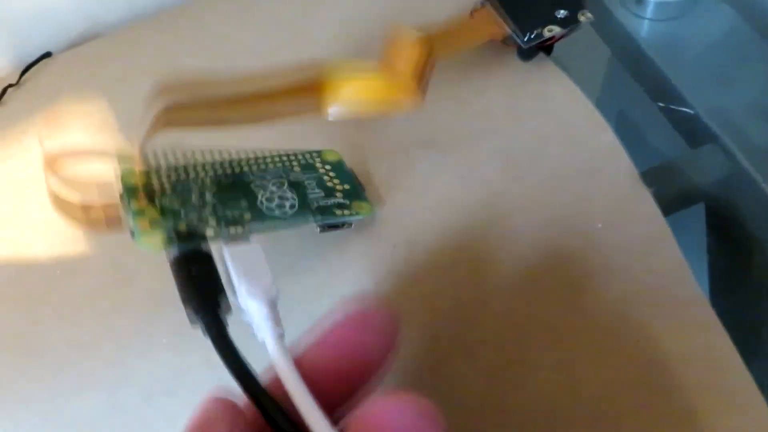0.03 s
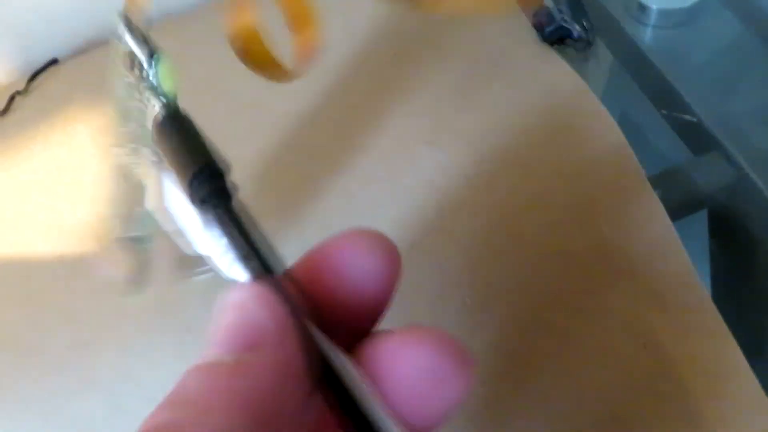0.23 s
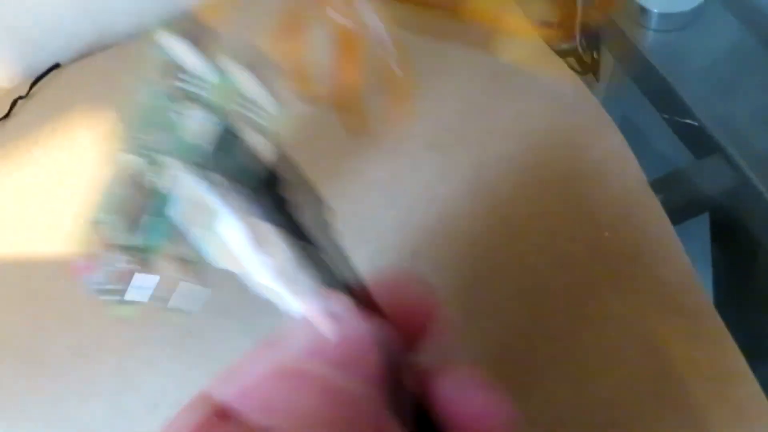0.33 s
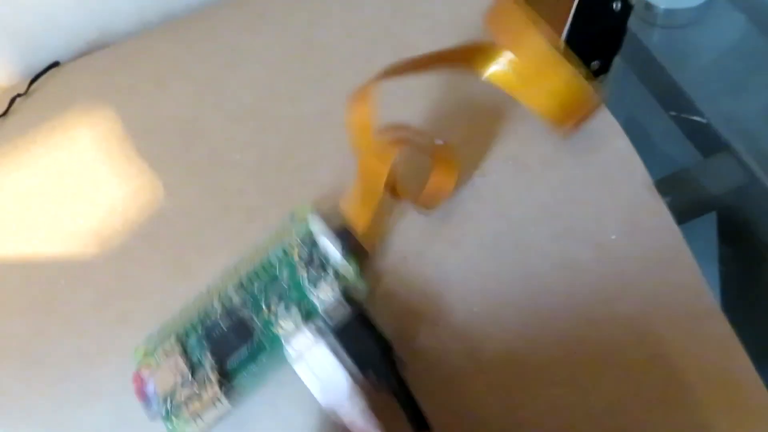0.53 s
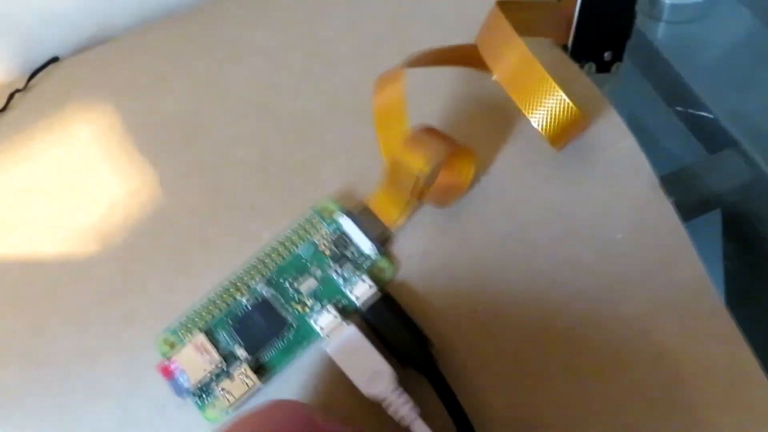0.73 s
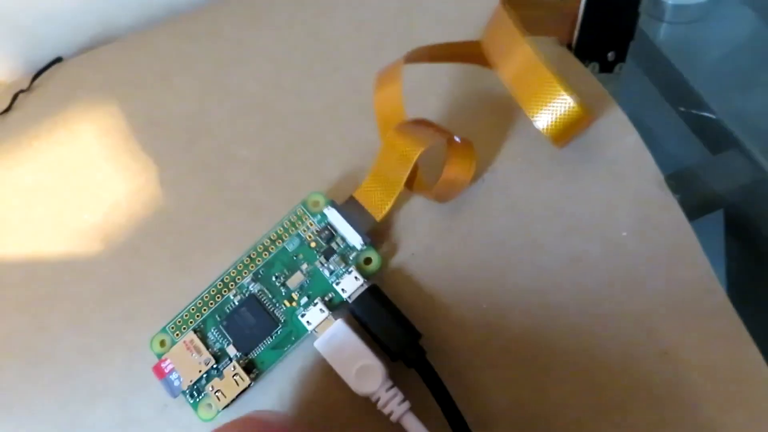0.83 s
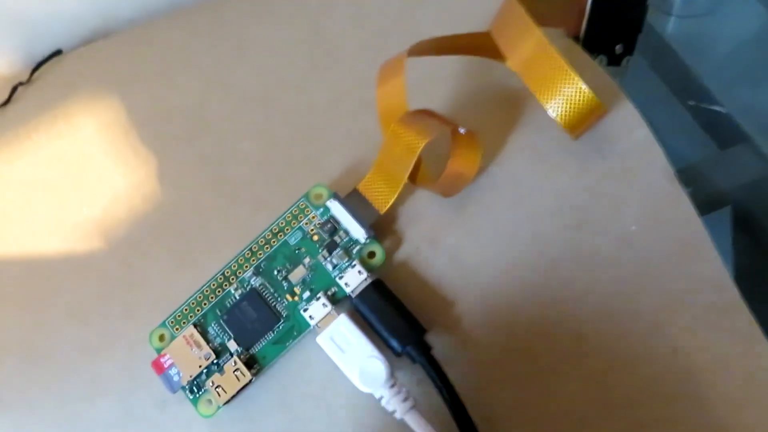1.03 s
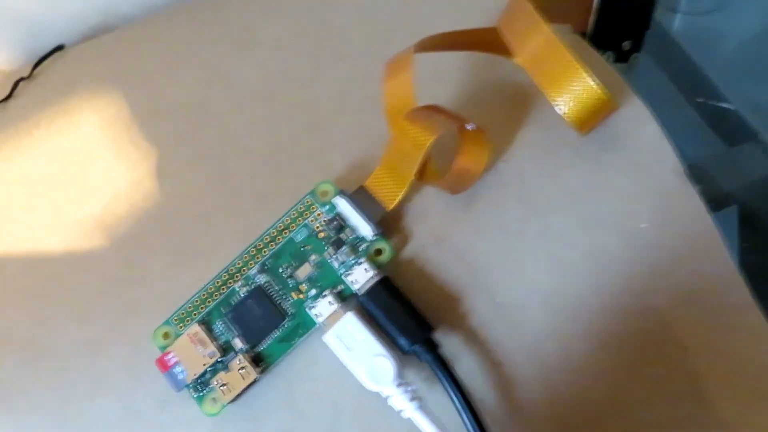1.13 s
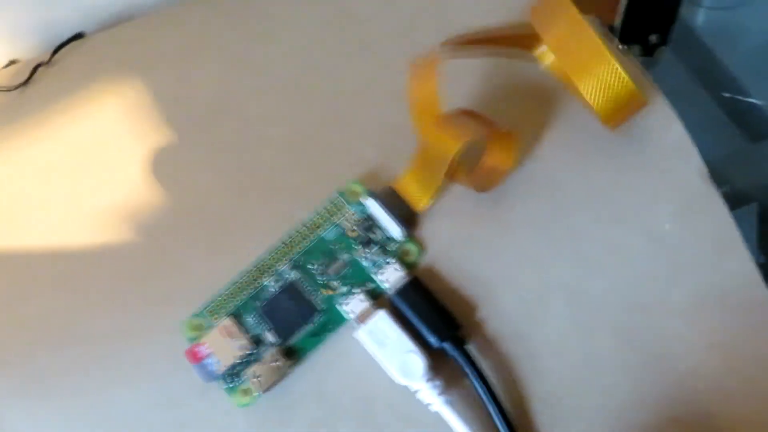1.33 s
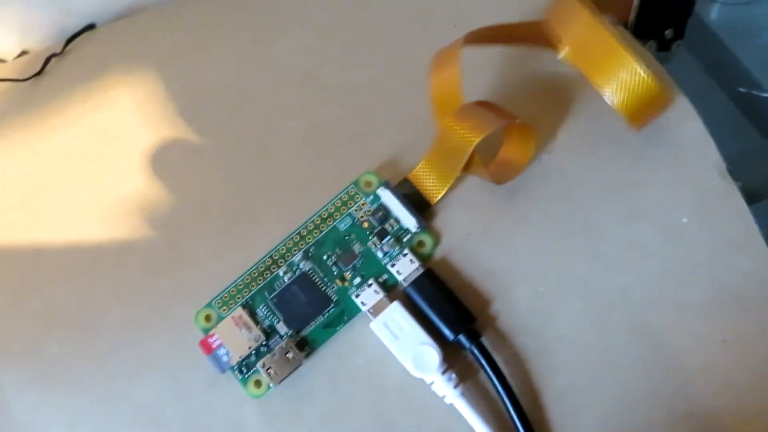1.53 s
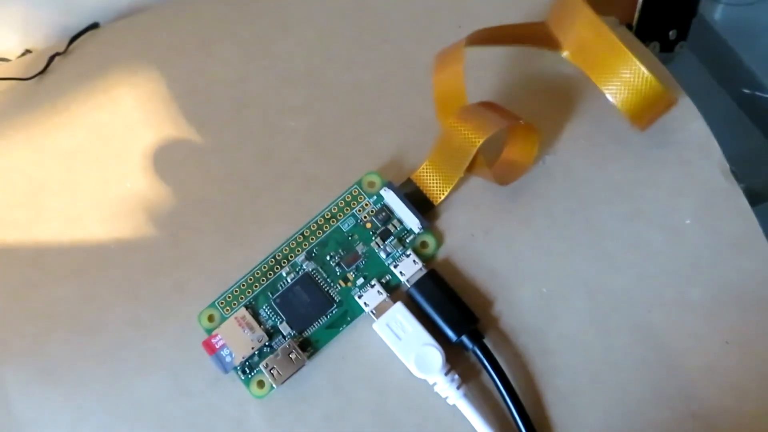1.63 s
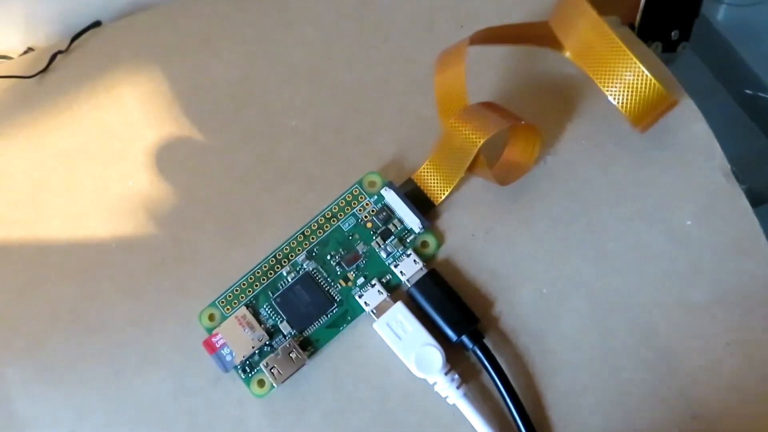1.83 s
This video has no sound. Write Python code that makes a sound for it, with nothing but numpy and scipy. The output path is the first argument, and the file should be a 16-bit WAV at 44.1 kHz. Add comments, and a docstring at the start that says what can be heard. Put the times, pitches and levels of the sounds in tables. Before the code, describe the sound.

A small circuit board rustles as it is turned over, then clatters onto a paper-covered table, sliding and settling in light knocks. A moment later its cables thump down and jolt it. Close microphone in a small, quiet room.

```python
"""A circuit board laid on a table

A small board with plugged-in cables is turned over by hand and laid on a paper-covered table,
close to the microphone. Its ribbon cable rubs on the paper; an edge taps down and rings, then the
board drops, slides and settles in small knocks. A moment later the released cables fall onto
the table, jolting the board again. A small, quiet room surrounds it."""
import sys
import numpy as np
from scipy import signal
from scipy.fft import rfft, irfft, next_fast_len
from scipy.io import wavfile
from scipy.ndimage import map_coordinates

SR = 44100
rng = np.random.default_rng(int(sys.argv[2]) if len(sys.argv) > 2 else 0)


def wav_record(signal):
    """Record a signal, one row per channel, as 16-bit PCM in the file named by sys.argv[1]."""
    frames = np.transpose(np.atleast_2d(signal))
    bounded = np.clip(frames, -1, 1)
    # unit amplitude maps onto the largest positive 16-bit level
    quanta = np.round(bounded * 32767).astype(np.int16)
    wavfile.write(sys.argv[1], SR, quanta)


N = 83790  # 1.9 seconds

# The tone colour of six noises. Each row: frequency in Hz, relative level in dB.
AIR_COLOUR = [(15, -40), (25, -13), (71, -16.5), (106, -4), (219, -13), (309, -10), (543, -21), (879, -15),
              (1240, -19), (1910, -20), (7890, -36.5), (12800, -49), (15000, -80)]
SCRAPE_COLOUR = [(150, -44), (350, -19.5), (640, -7.5), (830, -12.5), (1150, -6), (1350, -4.5), (1650, -1),
                 (1880, -4), (2100, -8.5), (2480, -6), (3200, -11), (4200, -18), (5000, -17), (7000, -41),
                 (12000, -62)]
HISS_COLOUR = [(3000, -12), (5500, 3), (7500, -0.5), (10000, -1.5), (13000, -3.5), (15500, -7.5)]
RUMBLE_COLOUR = [(25, -20), (60, -5.5), (120, 1), (250, -3), (400, -5.5), (800, -11), (2000, -55)]
TICK_COLOUR = [(600, -2), (1700, 7.5), (3000, -2.5), (5200, -1.5), (7000, -6), (11000, -9.5),
               (15500, -10.5)]
CRACK_COLOUR = [(40, -11), (130, -5.5), (600, 1.5), (820, -2.5), (1500, -1), (3500, -4.5), (6500, -20.5),
                (15000, -28.5)]

# Three sliding moves. Each row: time in seconds, then relative levels in dB of scrape, hiss and rumble.
TURNING = [(0, -70, -68, -54.5), (.055, -52, -56, -61.5), (.1, -47, -54, -49.5), (0.154, -43.5, -51.5, -59),
           (.2, -27.5, -68, -37.5), (.245, -28, -46, -50), (.265, -25, -40, -53),
           (0.313, -18.5, -30, -44.5), (.335, -36.5, -54, -35), (.36, -41.5, -67, -56),
           (0.419, -44, -53, -49)]
LAYING_DOWN = [(0.422, -35, -55, -17.5), (0.441, -16.5, -31, -35.5), (0.459, -28.5, -47, -32.5),
               (0.491, -23, -45, -31.5), (0.518, -30.5, -29.5, -45), (0.546, -25, -43, -30),
               (0.573, -24.5, -34.5, -28.5), (.588, -15.5, -33, -53), (.625, -17, -37.5, -53),
               (0.654, -22.5, -35, -41.5), (.672, -29.5, -43.5, -37), (0.702, -20.5, -41, -52),
               (.73, -36.5, -62, -30), (.76, -32, -38, -41.5), (.8, -31.5, -54, -40),
               (0.871, -33, -44.5, -41), (0.951, -42.5, -57.5, -47), (.995, -42, -61, -57),
               (1.045, -51, -63, -51.5), (1.2, -59, -79, -57)]
CABLE_FALL = [(1.41, -56, -69, -66), (1.427, -44, -70, -33.5), (1.465, -25.5, -51, -27.5),
              (1.492, -40.5, -54, -34.5), (1.526, -23, -45, -27.5), (1.548, -35.5, -69, -34.5),
              (1.6, -39.5, -67, -45), (1.7, -48.5, -62, -49), (1.79, -53, -64.5, -56), (1.9, -73, -69, -77)]
# How strongly the rubbing rings in each of those moves, in dB added to its scrape level.
RUB_RING_DB = [-4, -4, -3]

# The tones of the rubbed board and ribbon, the knocked board, its edge and a metal plug shell.
# Each row: pitch in Hz, relative level in dB, fade time in seconds (t60, the time to fall by 60 dB).
RUBBED_TONES = [(668, -8, 0.089), (1134, -9.5, 0.085), (1366, -6.5, 0.047), (1523, -2, 0.05),
                (1664, 2.5, 0.04), (1799, -4, 0.069), (1877, -8.5, 0.13), (2335, -8.5, 0.076),
                (2508, -8, 0.071), (2653, -1.5, .08), (2850, -11, 0.095), (3445, -8, 0.038),
                (5060, -18.5, 0.061)]
BOARD_TONES = [(632, -15, 0.047), (1143, -6, 0.014), (1353, -13.5, 0.047), (1534, -1, 0.039),
               (1634, -0.5, 0.024), (1837, -13, 0.041), (2190, -10, 0.028), (2384, -15, .03),
               (3400, -14, 0.013), (4830, -15.5, 0.0074), (5250, -19, 0.0073)]
EDGE_TONES = [(880, -18, 0.018), (1003, 2, 0.052), (1118, -1.5, 0.078), (1617, -7, 0.076),
              (1714, -9.5, 0.082), (1934, -12, 0.084), (2280, -9.5, 0.043), (2367, -10.5, 0.054),
              (2950, -21, 0.045), (3365, -22, 0.15), (4390, -29, .04)]
SHELL_TONES = [(7900, -2.5, 0.024), (9630, -3, .015), (9220, -2.5, .015), (10600, -3, 0.009),
               (10850, -0.5, 0.012), (11600, 0, 0.013), (13100, 0, .012)]

# The ribbon and plugs tick. Each row: start in seconds, level in dB, fade time in seconds.
TICKS = [(.056, -38.5, 0.083), (.062, -37.5, 0.08), (0.08, -37, 0.019), (0.125, -34.5, 0.042),
         (.155, -27.5, 0.046), (.388, -33, 0.011), (0.436, -34, 0.033), (.532, -15.5, 0.033),
         (.684, -18, 0.026), (0.7095, -20, .02), (0.76, -22.5, 0.034), (0.777, -25.5, 0.07),
         (0.847, -32, 0.052), (0.985, -34, 0.057), (1.497, -21.5, 0.028), (1.5177, -18.5, 0.026),
         (1.529, -49, 0.014), (1.61, -35, .03), (1.621, -36, 0.069), (1.63, -25.5, 0.018),
         (1.684, -34, 0.048), (1.726, -32.5, 0.02)]
# Small stiff parts ping. Each row: start in seconds, level in dB, pitch in Hz.
PINGS = [(.058, -44, 5300), (.4365, -21, 4680), (.4415, -17, 3310), (.5375, -10.5, 2470),
         (1.444, -30, 3400), (1.4975, -20.5, 3840), (1.5295, -27, 5060)]
# The board knocks on the table. Each row: start in seconds, level in dB,
# brightness in dB per octave, level of the crack in dB relative to the knock.
KNOCKS = [(0.1545, -33.5, 10, -14), (.258, -30, 6, -25), (0.267, -21, 1, -22), (0.4227, -16.5, -10, -13),
          (0.436, -16.5, 10, -2), (.442, -26, 5, -3), (0.5374, -6, -4, -3.5), (0.6177, -12, 5.5, -8),
          (0.632, -17, 7, 0), (0.684, -14, 6, -12), (.693, -16.5, -2, -23), (0.703, -21.5, 9.5, -4),
          (.742, -31.5, -12, 5), (0.7786, -21.5, 8, -12), (0.781, -20, 10, -8), (0.8194, -13, -6, -6.5),
          (0.8733, -21, -2, -6.5), (.976, -24.5, -5, -22), (0.9792, -22.5, -0.5, -16),
          (.987, -18.5, -0.5, -21), (.996, -22, -3, -10), (1.007, -30, -7, -8), (1.021, -36, 5, 3),
          (1.107, -34.5, -1, -1.5), (1.4408, -10.5, -4, 0), (1.4602, -22.5, 7, 2.5), (1.498, -31, -2, 5),
          (1.557, -25, -4, -3), (1.633, -21.5, 4, -10), (1.695, -20.5, 3.5, -10), (1.728, -31.5, 2, 1.5),
          (1.75, -35, 0, -16), (1.771, -44, 6, -12), (1.804, -39.5, 2, -18)]
# The cables thump. Each row: start in seconds, level in dB, pitch in Hz, fade time in seconds.
THUMPS = [(0.327, -56, 124, .08), (0.421, -24.5, 132, 0.14), (.539, -25, 123.2, 0.119),
          (.54, -17.5, 348, 0.068), (.553, -20, 280, 0.025), (0.694, -34, 75, 0.088),
          (0.756, -21.5, 260, 0.033), (.788, -28, 205, 0.1), (0.82, -55, 114, .1), (1.107, -52, 171, .07),
          (1.422, -34, 83.5, .1), (1.44, -24, 99, 0.068), (1.452, -20, 214, 0.13),
          (1.4677, -8.5, 263, 0.034), (1.5085, -4.5, 510, 0.012), (1.518, -27, 219, 0.11),
          (1.581, -33, 215, 0.085), (1.872, -44, 152, 0.097)]
# The board's edge taps. Each row: start in seconds, level in dB.
EDGE_TAPS = [(.422, -7), (.427, -15.5), (.462, -14), (.467, -14), (.481, -14.5), (.489, -21)]
# A plug shell scratches. Each row: start in seconds, level in dB, fade time in seconds.
SCRATCHES = [(.494, -23, 0.043), (.5065, -30, 0.068), (.516, -30, 0.13), (.625, -27, 0.069),
             (.755, -51, .05), (1.518, -27, 0.025)]

# How long the room echoes. Each row: frequency in Hz, fade time in seconds.
ROOM_FADES = [(150, 0.27), (600, 0.19), (1600, 0.11), (4000, 0.11), (12000, 0.14)]
# How alike left and right are for the close sounds, the air and the echo.
# Each row: frequency in Hz, likeness from 0 (unrelated) to 1 (the same).
CLOSE_LIKENESS = [(40, 0.93), (90, 1), (250, 0.99), (600, 0.98), (1100, 1), (1700, 1), (2500, 0.99),
                  (3500, 0.84), (5000, 0.85), (7000, 0.58), (10000, 0.42), (14000, 0.057)]
AIR_LIKENESS = [(60, 0.99), (120, 0.94), (240, 0.26), (480, 0.05), (950, 0.084), (1890, 0.2), (3770, 0.09),
                (7520, 0.05), (15000, 0.04)]
ECHO_LIKENESS = [(100, 1), (300, 1), (700, 1), (1600, 1), (3000, 0.52), (6000, 0.19), (12000, .05)]

HARD_ATTACK_S, SOFT_ATTACK_S = .0003, .0013  # how quickly a hit swells


def amp(db):
    """Turn decibels into a number to multiply by."""
    return 10 ** (np.asarray(db) / 20)


def unit(x):
    """Scale a signal to an average strength (rms) of 1."""
    return x / np.sqrt(np.mean(x ** 2) + 1e-20)


def look_up(points, hz):
    """Read between a table's rows, on a logarithmic frequency scale."""
    freqs, values = np.transpose(points)
    return np.interp(np.log(hz + 1), np.log(freqs + 1), values)


def filtered(x, response):
    """Multiply each frequency in x by response(hz)."""
    size = x.shape[-1]
    padded = next_fast_len(size + 8192)
    return irfft(rfft(x, padded) * response(np.fft.rfftfreq(padded, 1 / SR)), padded)[..., :size]


def stereo_angle(likeness, hz):
    """An angle in radians that grows as left and right become less alike."""
    return np.arccos(np.clip(look_up(likeness, hz), -1, 1)) / 2


def spread(pair, likeness):
    """Blend two unrelated signals into left and right, as alike as asked."""
    angle = lambda hz: stereo_angle(likeness, hz)
    mid, side = filtered(pair, lambda hz: np.array([np.cos(angle(hz)), np.sin(angle(hz))]))
    return np.array([mid + side, mid - side])


def noise(colour, grain=1, likeness=CLOSE_LIKENESS):
    """Stereo noise with a given tone colour, roughened by grain if given."""
    white = grain * rng.standard_normal((2, N))
    coloured = filtered(white, lambda hz: amp(look_up(colour, hz)))
    return unit(spread(coloured, likeness))


def add(out, start, sound):
    """Mix a sound in at a start time in seconds."""
    part = out[:, max(0, round(start * SR)):][:, :sound.shape[-1]]
    part += sound[..., :part.shape[1]]


def fade(t60, attack=0.00072):
    """The loudness shape of a hit: a quick rise, then a steady fall."""
    t = np.arange(SR // 4) / SR
    return amp(-60 * t / t60) * (1 - np.exp(-t / attack))


def burst(source, t60):
    """A random piece of a noise, dying away."""
    envelope = fade(t60)
    offset = rng.integers(N - len(envelope))
    return source[:, offset:offset + len(envelope)] * envelope


def ring(tones, attack, tilt_db=0, left_lead=0, scatter_db=1.2):
    """A struck object's fading tones; the higher ones reach left and right out of step."""
    t, out = np.arange(SR // 4) / SR, 0
    for hz, db, t60 in tones:
        skew = left_lead + stereo_angle(CLOSE_LIKENESS, hz) * rng.choice([-1, 1])
        phases = np.array([[skew], [-skew]])
        level = db + tilt_db * np.log2(hz / 1600) + scatter_db * rng.standard_normal()
        out = out + amp(level) * fade(t60, attack) * np.sin(2 * np.pi * hz * t + phases)
    return out


def resonate(x, tones):
    """Rubbing noise makes an object ring at its own tones."""
    def peak(f, hz, t60):
        width_hz = np.log(1000) / np.pi / t60
        damping = 1j * f * width_hz
        return damping / (hz * hz - f * f + damping)
    return unit(filtered(x, lambda f: sum(amp(db) * peak(f, hz, t60) for hz, db, t60 in tones)))


def still_air():
    """The steady, low hush of the room."""
    return noise(AIR_COLOUR, likeness=AIR_LIKENESS)


def friction_grain(catches_per_s=6000, spread_db=2, smooth_part=.9):
    """Sliding surfaces make tiny catches of uneven size over a smooth rub."""
    caught = rng.random(N) < catches_per_s / SR
    catches = caught * amp(spread_db * rng.standard_normal(N))
    return np.sqrt(unit(catches) ** 2 + smooth_part ** 2)


def paper_grit(bumps_per_s=250, depth_db=2):
    """The paper's roughness makes the hiss surge and drop every few milliseconds."""
    bumps = rng.standard_normal(int(N * bumps_per_s / SR) + 4)
    smooth_curve = map_coordinates(bumps, [np.arange(N) * bumps_per_s / SR])
    return amp(depth_db * smooth_curve)


def sliding(rub_db=-2.5):
    """Ribbon, board and cables rub on the paper; the catches ring the board and the table rumbles."""
    t, out = np.arange(N) / SR, 0
    grain = friction_grain()
    rub = amp(rub_db) * noise(SCRAPE_COLOUR, grain)
    friction = spread(grain * rng.standard_normal((2, N)), CLOSE_LIKENESS)
    ringing = resonate(friction, RUBBED_TONES)
    hiss = noise(HISS_COLOUR, grain * paper_grit())
    rumble = noise(RUMBLE_COLOUR)
    for move, ring_db in zip((TURNING, LAYING_DOWN, CABLE_FALL), RUB_RING_DB):
        times, *levels = np.transpose(move)
        scrape = rub + amp(ring_db) * ringing
        for layer, db in zip((scrape, hiss, rumble), levels):
            out = out + layer * amp(np.interp(t, times, db, left=-120, right=-120))
    return out


def ribbon_ticks():
    """The ribbon and plugs tick in short bursts of bright noise."""
    out, tick = np.zeros((2, N)), noise(TICK_COLOUR)
    for start, db, t60 in TICKS:
        add(out, start, amp(db) * burst(tick, t60))
    return out


def plug_pings(t60=0.029):
    """Small stiff parts of the plugs ring briefly, each with one high tone."""
    out = np.zeros((2, N))
    for start, db, hz in PINGS:
        add(out, start, amp(db) * ring([(hz, 0, t60)], HARD_ATTACK_S))
    return out


def board_knocks(detune=.02):
    """The loose board hits the table with a crack and a dry ring, its pitch shifted by how it lies."""
    out, crack_noise = np.zeros((2, N)), noise(CRACK_COLOUR)
    for start, db, tilt_db, crack_db in KNOCKS:
        pitch_factor = 1 + detune * rng.standard_normal()
        tones = np.array(BOARD_TONES) * [pitch_factor, 1, 1]
        ringing = ring(tones, HARD_ATTACK_S, tilt_db)
        crack = amp(crack_db) * burst(crack_noise, t60=.028)
        add(out, start, amp(db) * (ringing + crack))
    return out


def cable_thumps():
    """Soft cables land on the table, each thump one low, fading tone."""
    out, t = np.zeros((2, N)), np.arange(SR // 4) / SR
    for start, db, hz, t60 in THUMPS:
        add(out, start, amp(db) * fade(t60, SOFT_ATTACK_S) * np.sin(2 * np.pi * hz * t))
    return out


def edge_taps():
    """The held board's edge chatters on the table and rings longer than a knock."""
    out = np.zeros((2, N))
    for start, db in EDGE_TAPS:
        add(out, start, amp(db) * ring(EDGE_TONES, SOFT_ATTACK_S, left_lead=0.12))
    return out


def plug_scratches():
    """Brief scratches ring the very high tones of a metal plug shell."""
    out, shell = np.zeros((2, N)), resonate(noise(HISS_COLOUR), SHELL_TONES)
    for start, db, t60 in SCRATCHES:
        add(out, start, amp(db) * burst(shell, t60))
    return out


def room_echo(x, delay_s=.004):
    """The room answers with a short wash of sound; each frequency dies at its own speed."""
    hz, t, spectrum = signal.stft(rng.standard_normal((2, SR // 2)), SR, nperseg=256)
    decay = amp(-60 * t / look_up(ROOM_FADES, hz)[:, None])
    _, tail = signal.istft(spectrum * decay, SR, nperseg=256)
    tail = spread(tail, ECHO_LIKENESS)
    tail /= np.linalg.norm(tail[0])
    delayed = np.pad(tail, ((0, 0), (round(delay_s * SR), 0)))
    return signal.fftconvolve(x, delayed, axes=1)[:, :N]


def scene(echo_db=-10, air_db=-46.5):
    """The close handling sounds, their echo and the still air."""
    close = sliding() + ribbon_ticks() + plug_pings() + board_knocks()
    close += cable_thumps() + edge_taps() + plug_scratches()
    return close + amp(echo_db) * room_echo(close) + amp(air_db) * still_air()


def record(dry, top_hz=15700):
    """Cut away the very highest treble."""
    return filtered(dry, lambda hz: hz < top_hz)


dry = scene()
out = record(dry)
wav_record(out)
```